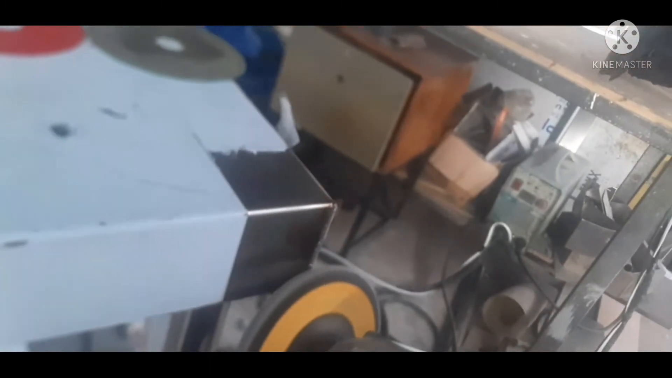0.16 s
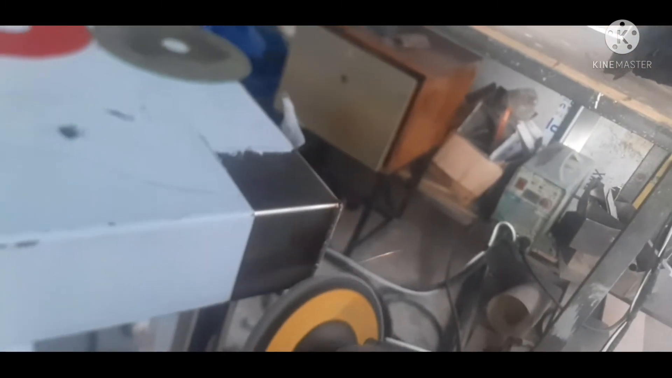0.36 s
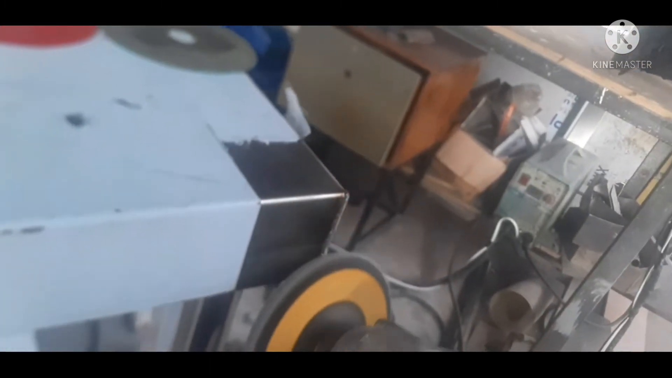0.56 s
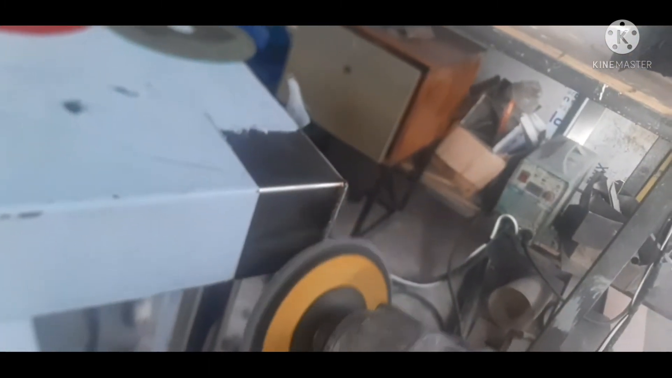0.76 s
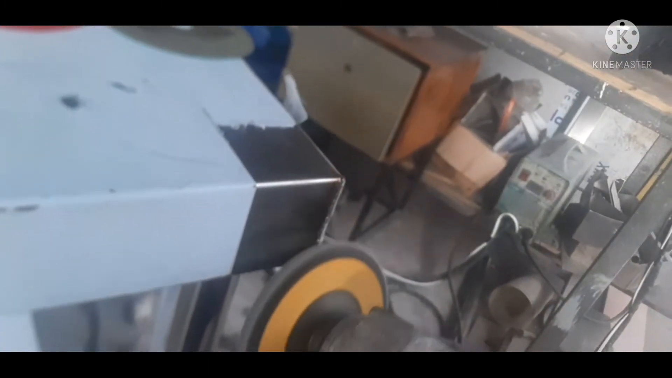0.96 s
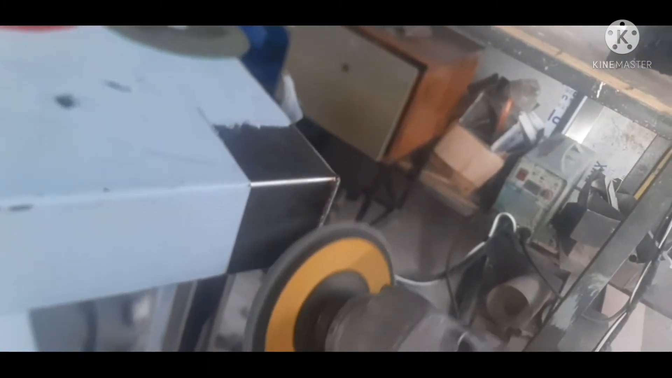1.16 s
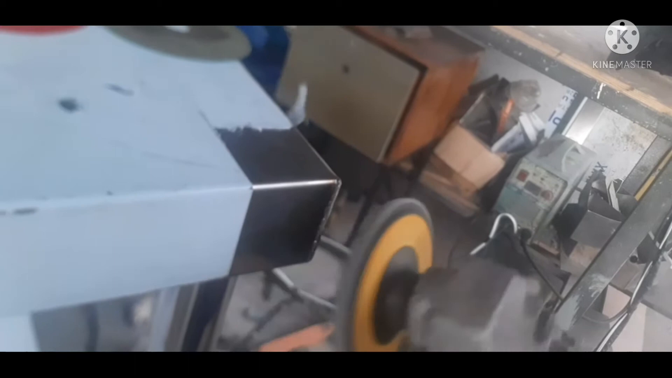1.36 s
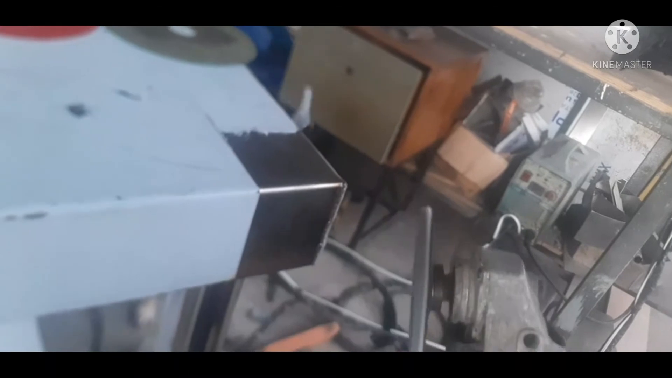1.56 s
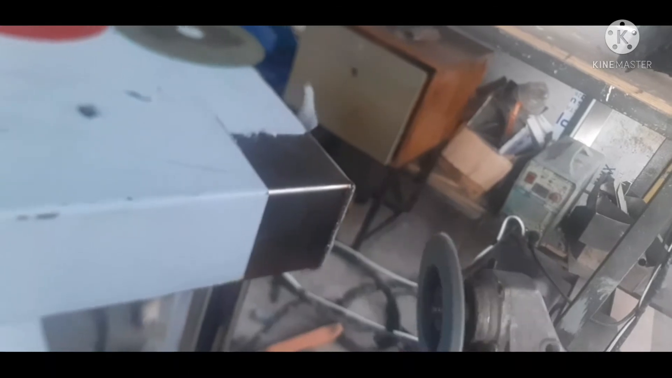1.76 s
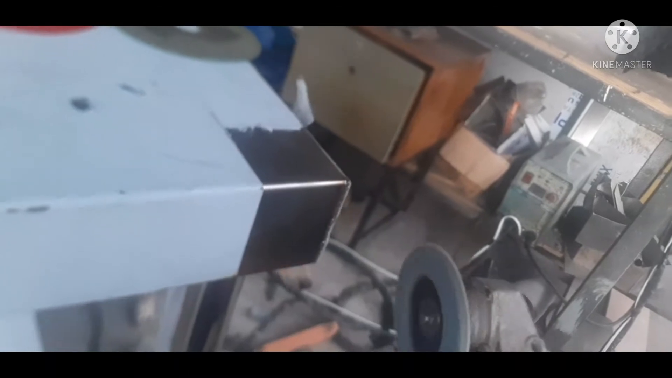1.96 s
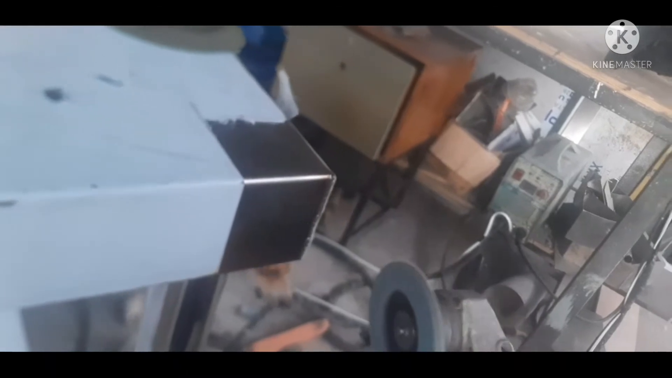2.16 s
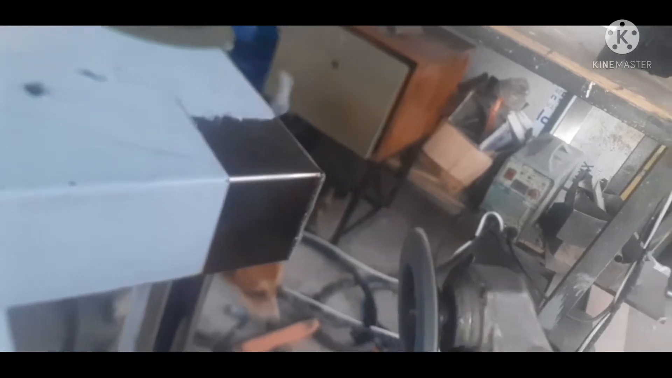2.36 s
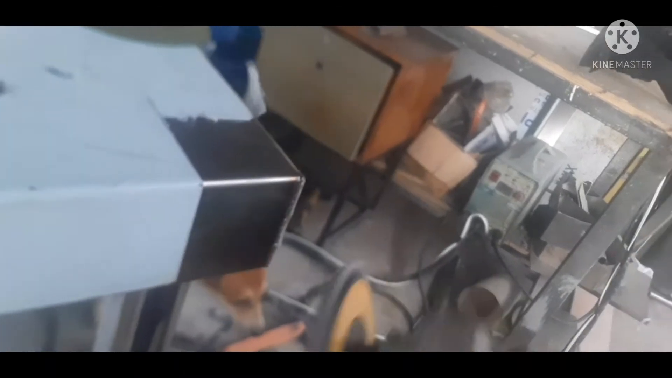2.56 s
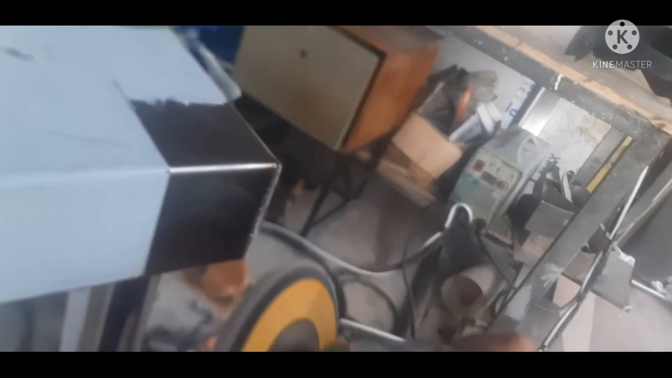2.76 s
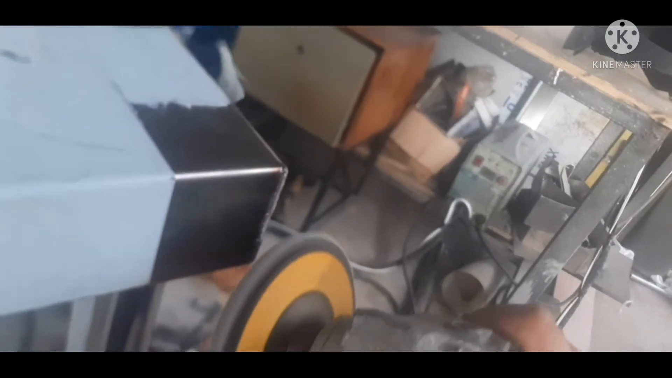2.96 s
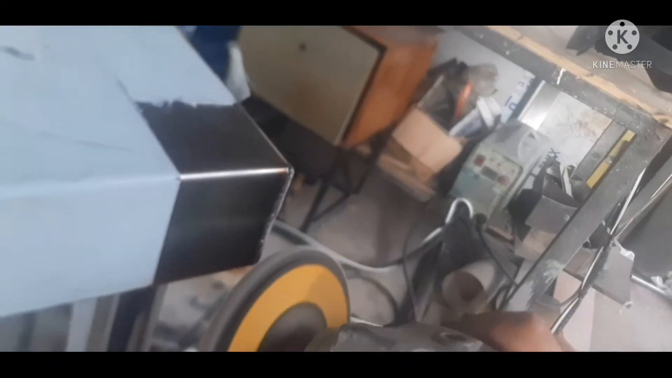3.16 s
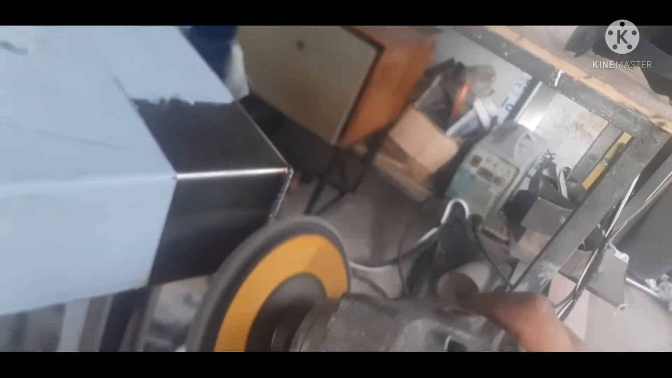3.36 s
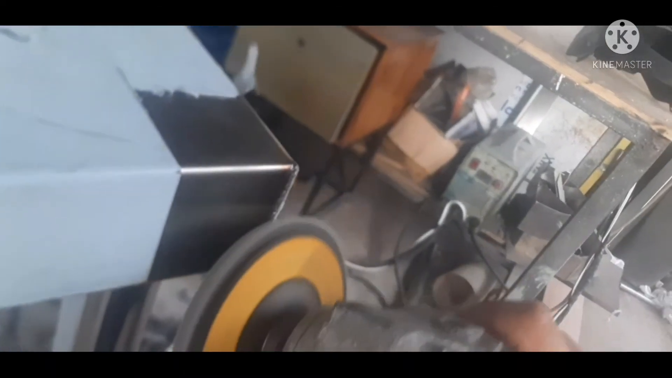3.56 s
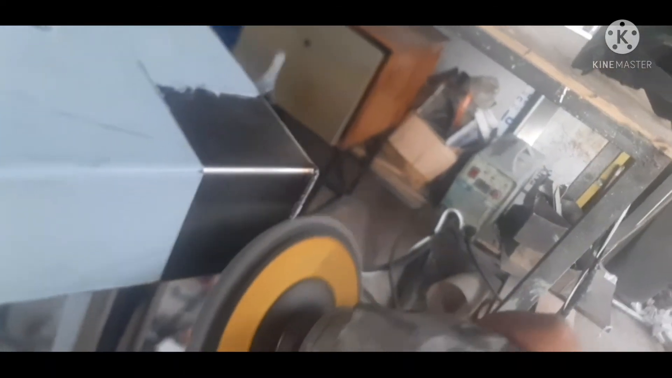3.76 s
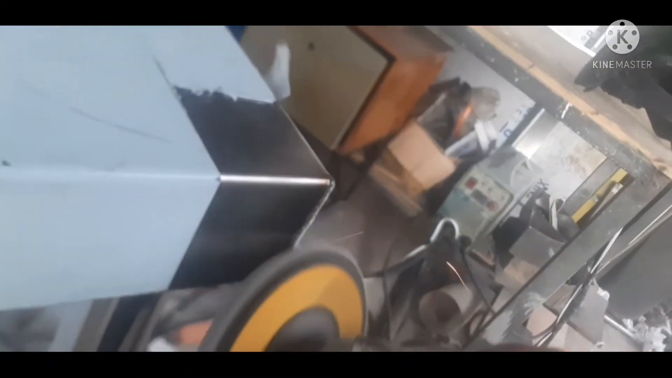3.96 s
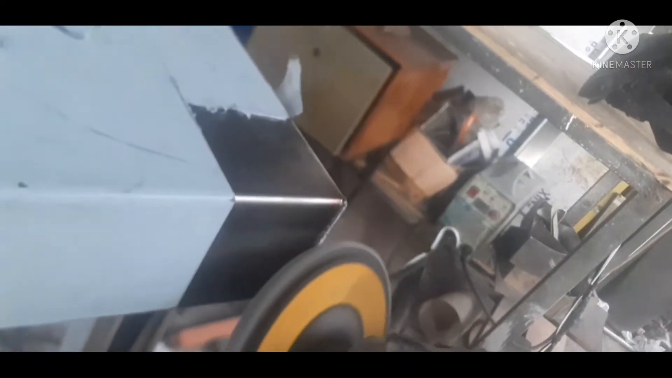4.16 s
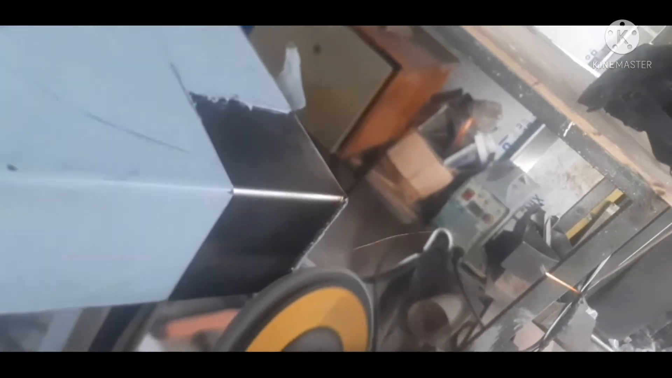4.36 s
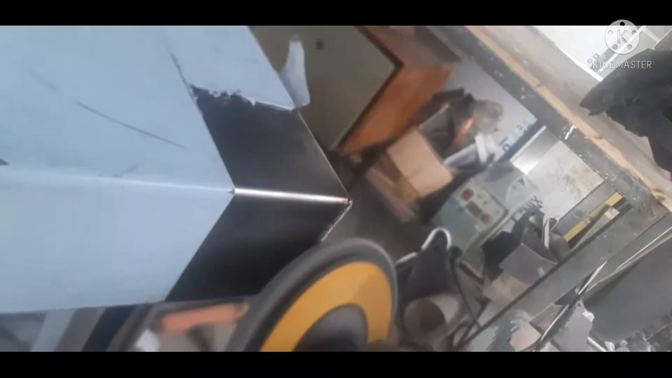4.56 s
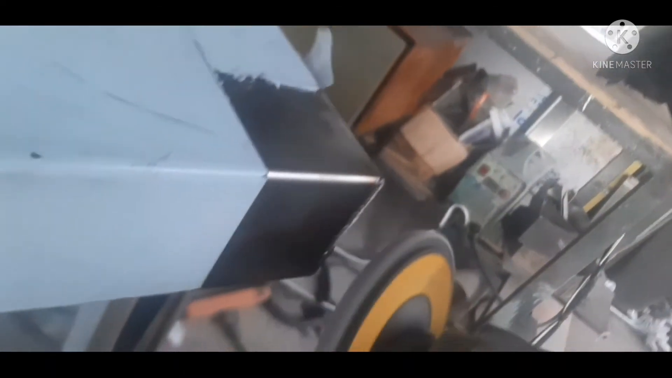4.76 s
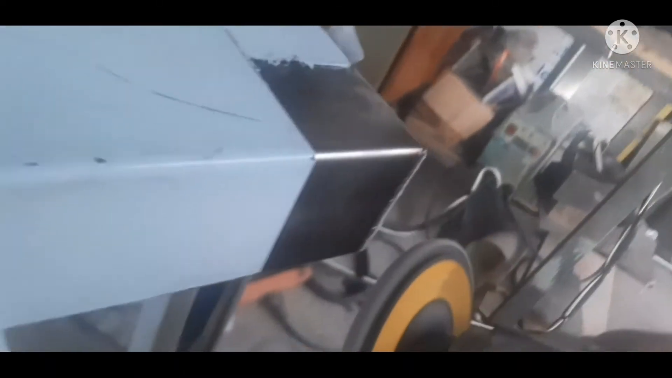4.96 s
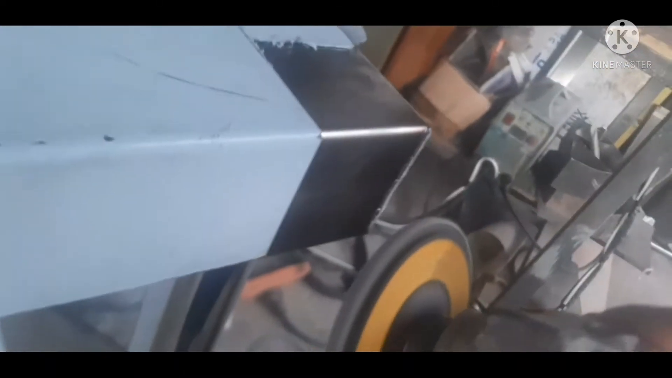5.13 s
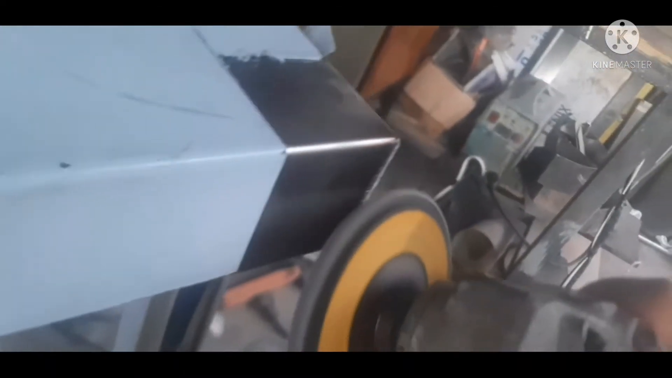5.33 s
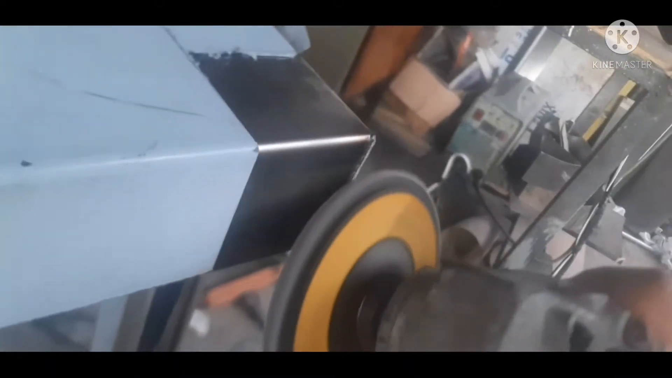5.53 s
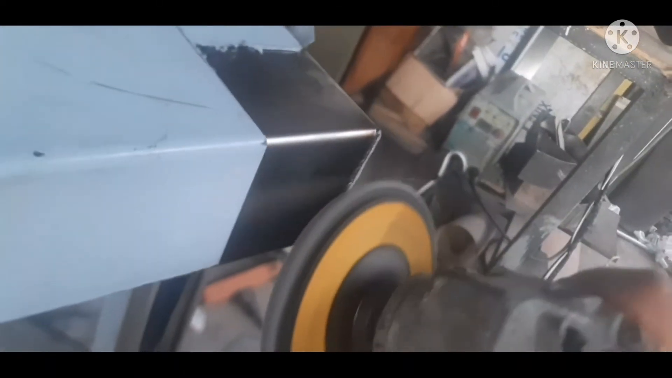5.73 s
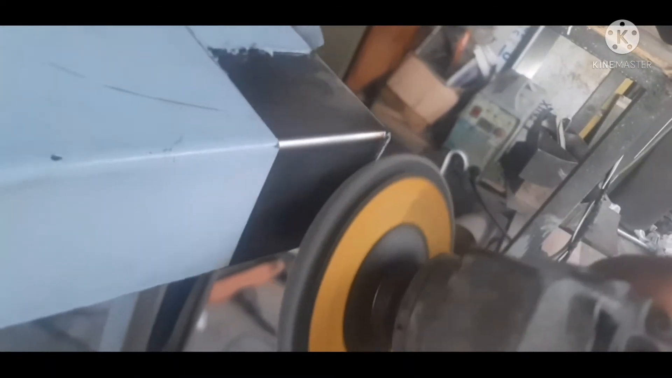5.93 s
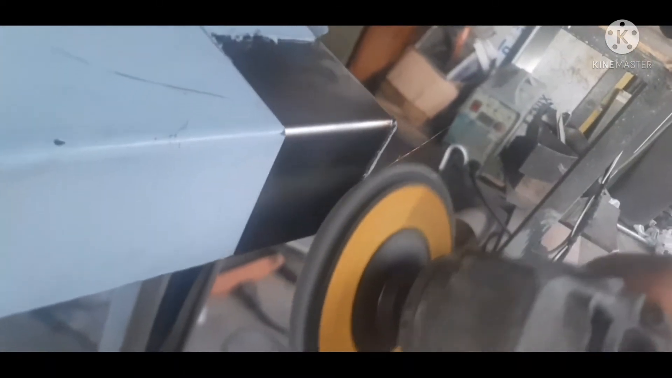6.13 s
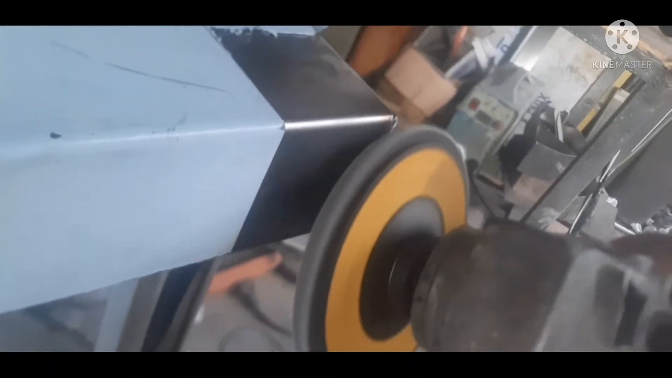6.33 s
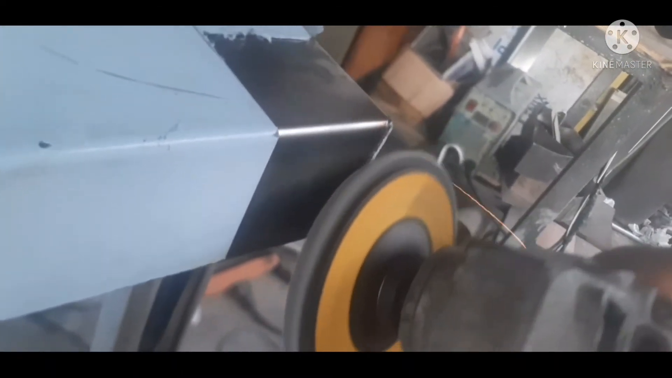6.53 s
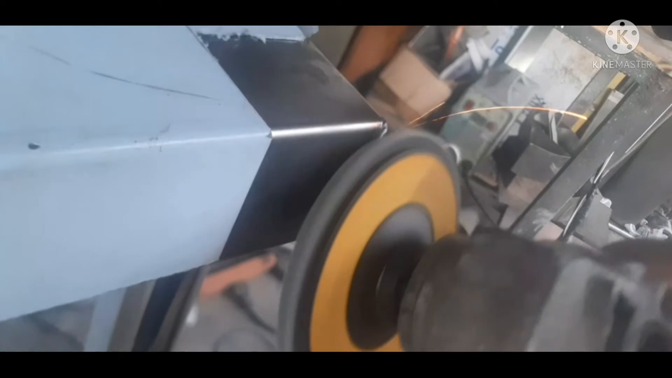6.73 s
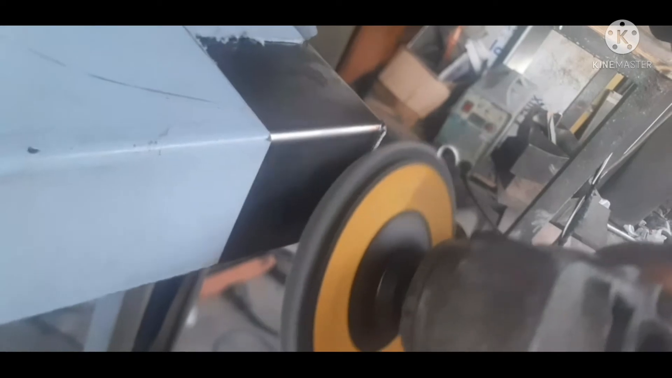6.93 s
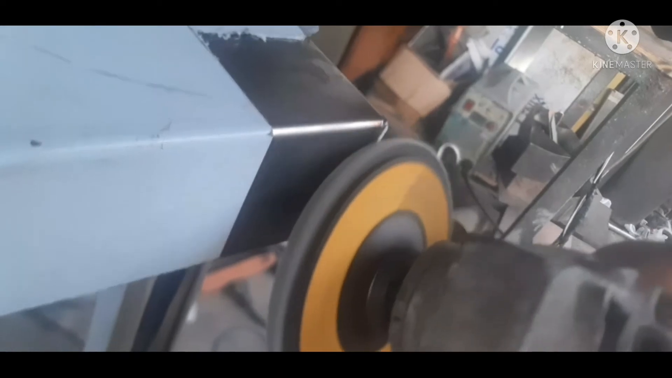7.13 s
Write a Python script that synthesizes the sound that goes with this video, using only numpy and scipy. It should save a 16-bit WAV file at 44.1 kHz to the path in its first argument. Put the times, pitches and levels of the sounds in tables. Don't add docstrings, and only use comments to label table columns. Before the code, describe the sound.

An angle grinder's flap disc scrapes harshly on steel over a rattling motor roar, lifts, then presses down twice more, close up in a workshop.

```python
import sys
import numpy as np
from scipy import signal
from scipy.fft import rfft, irfft
from scipy.io import wavfile
from scipy.ndimage import uniform_filter1d, minimum_filter1d, map_coordinates

SR = 44100
rng = np.random.default_rng(int(sys.argv[2]) if len(sys.argv) > 2 else 0)


def ratio_of_db(decibels):
    return 10 ** (np.asarray(decibels, float) / 20)


def put_to_file(sound):
    columns = np.atleast_2d(sound).T
    safe = np.clip(columns, -1, 1)
    whole_steps = np.round(safe * 32767)
    wavfile.write(sys.argv[1], SR, whole_steps.astype(np.int16))


N = 317079
SIZE, HOP = 512, 192
HZ = np.fft.rfftfreq(SIZE, 1 / SR)[:, None]
T = np.arange(N) / SR

# t/s, level/dB, brightness facing the phone/dB, guard twist/dB, front wall tilt/dB
TOOL = [(0.0, -25, 3, 10.5, 4.5), (0.5, -27, 4, 8, 4), (1.46, -26.5, 5, 4.5, 3), (1.64, -25, 5, 2, 1.5),
        (1.88, -29.5, 4, -2.5, -2.5), (2.27, -33, 3.5, -2.5, -1), (2.4, -32, 4, -2, 4.5),
        (2.68, -29, 5, -3.5, -2), (2.94, -24, 6.5, -3, -1.5), (3.1, -21, 7.5, -1.5, -1.5),
        (3.45, -23, 6.5, 2, 0.5), (4.0, -26, 5.5, 3, -1.5), (4.4, -26.5, 6, 2, -0.5),
        (4.79, -27, 6, 3, -3.5), (4.93, -25.5, 6, 3.5, 1), (5.3, -26, 4, -0.5, 2),
        (5.7, -26, 5.5, -2, -1.5), (6.0, -25.5, 6.5, 2, -4), (6.4, -26.5, 5.5, -5, -1.5),
        (7.19, -27, 6.5, -7, -3)]
# f/Hz, level/dB per Hz
FACING = [(650, -37), (1100, -6), (1540, -9.5), (2010, -2.5), (2460, -8.5), (2700, -1.5), (2920, -5),
          (3570, -1.5), (4030, -1), (4720, 1), (6750, -6.5), (8260, -19.5), (11300, -17), (14100, -18),
          (16000, -17)]
# f/Hz, level/dB per Hz
AWAY = [(650, -44), (1100, -11.5), (1930, -13), (2230, -3.5), (2520, -10.5), (3050, -10.5), (6240, -16),
        (6680, -18.5), (7140, -15), (7990, -23.5), (10100, -24.5), (12000, -24), (12900, -23), (13700, -31),
        (16000, -19)]
FACING_DB, AWAY_DB = 6.5, 1.5
# f/Hz, width/Hz, level/dB
HOUSING = [(1165, 47, 6), (2075, 83, 1.5), (2450, 120, 4.5), (3120, 120, 5.5), (3576, 215, 4.5),
           (4800, 120, 2.5), (5340, 450, 2), (6670, 65, 10), (11400, 710, 1.5), (13800, 620, 3.5)]
# f/Hz, level/dB
KNOCK = [(1000, -15), (2200, -5), (3600, 0), (5000, -3.5), (6600, 7.5), (8500, -5), (11800, -3), (14000, 4),
         (16000, 5)]
RING_HZ, RING_WIDTH_HZ, RING_DB = 6630, 300, 6.0
FRONT_HZ, GUARD_HZ, WALL_WIDTH_HZ, VENTS_HZ = 3550, 5100, 450, 9000
BODY_HZ = 1056


def motor(knocks_per_s=76.0, jitter_knocks=0.7, ring_s=0.003, patchy_db=1.1):
    wobble = evened(uniform_filter1d(rng.standard_normal(N), size=5000))
    knock_count = np.floor(T * knocks_per_s + jitter_knocks * wobble)
    knocks = np.diff(np.maximum.accumulate(knock_count), prepend=0) > 0
    knocks = knocks * rng.uniform(0.35, 1, N)
    decay = np.exp(-1 / (ring_s * SR))
    beat = signal.lfilter([1], [1, -decay], uniform_filter1d(knocks, size=20))
    t, hiss = frames(rng.standard_normal((2, N)))
    rattle = frames(evened(beat * rng.standard_normal((2, N))))[1]
    share = ratio_of_db(read(KNOCK) + loaded("rattle", t) + 7.2 * patches(len(t), bins=14, steps=5))
    z = (hiss + share * rattle) / np.sqrt(1 + share ** 2)

    facing = (curve(TOOL, t, column=2) - AWAY_DB) / (FACING_DB - AWAY_DB)
    near, far = (read(side, np.maximum(HZ, 1150)) for side in (FACING, AWAY))
    near = near - band_db(near, 1100, 2600)
    far = far - band_db(far, 1100, 2600)
    colour = far + np.clip(facing, -0.3, 1.3) * (near - far)
    colour = colour + sum(db / (1 + (2 * (HZ - hz) / width) ** 2) for hz, width, db in HOUSING)
    colour = colour + np.exp(-((HZ - RING_HZ) / RING_WIDTH_HZ) ** 2) * (RING_DB + loaded("ring", t))
    colour = colour + np.exp(-((HZ - FRONT_HZ) / WALL_WIDTH_HZ) ** 2) * curve(TOOL, t, column=4)
    colour = colour + np.exp(-((HZ - GUARD_HZ) / WALL_WIDTH_HZ) ** 2) * curve(TOOL, t, column=3)
    colour = colour + loaded("vents", t) / (1 + (VENTS_HZ / (HZ + 1)) ** 8)
    colour = colour + curve(BASS_CUT, t, column=2) / (1 + (HZ / BODY_HZ) ** 16)
    colour = colour - band_db(colour, 1100, 2600) + curve(TOOL, t)
    return ports(t, z, colour + patchy_db * patches(len(t), bins=4, steps=14))


# touch t/s, lift t/s, pressure/dB, flap tone/dB
STROKES = [
    (-0.3, 1.53, -26, -21),
    (3.63, 4.86, -23.5, -12),
    (5.645, 7.5, -23, -8.5),
]
# f/Hz, level/dB per Hz
SCRAPE = [(2000, -13), (4000, -1.5), (6500, -5), (7500, -10), (8400, -11.5), (9500, -7.5), (10300, -3),
          (11500, -2), (12500, -1), (13500, -5.5), (14600, -0.5), (15500, 1)]
FLAPS = 71
DIG_DB, DIG_S = 1, 0.27


def disc(memory=0.908, fresh=0.85, lumpy_db=2.0, patchy_db=1.5):
    turns = np.cumsum(speed()) / SR
    places = 4 * FLAPS
    grit = rng.standard_normal((int(160 * T[-1]), 2, places))
    grit = signal.lfilter([1], [1, -min(memory, 0.99)], grit, axis=0)
    grit = grit.transpose(1, 0, 2).reshape(2, -1)
    worn = evened(np.array([map_coordinates(g, [turns * places], order=3) for g in grit]))
    high_spots = evened(uniform_filter1d(rng.standard_normal(places), size=12, mode="wrap"))
    rim = ratio_of_db(lumpy_db * np.interp(turns % 1 * places, np.arange(places), high_spots))
    scrape = evened(rim * (worn + fresh * rng.standard_normal((2, N))))

    pressure, tone = np.zeros(N), np.zeros(N)
    wobble = evened(smooth_twice(rng.standard_normal((2, N)), 4000))
    for start, stop, db, flap_db in STROKES:
        dig = 1 - np.exp(-np.maximum(T - start, 0) / DIG_S)
        touch = contact(start, stop, T)
        pressure += touch * ratio_of_db(db + DIG_DB * dig + 0.6 * wobble[0])
        tone += touch * dig * ratio_of_db(flap_db + 1.3 * wobble[1])
    port_phase = np.array([[0], [2]])
    flap = np.cos(2 * np.pi * FLAPS * turns + 0.51 * np.sin(2 * np.pi * turns) + port_phase)
    t, z = frames(pressure * (scrape + tone * flap))
    colour = read(SCRAPE) - band_db(read(SCRAPE), 9500, 15500)
    return ports(t, z, colour + patchy_db * patches(len(t), bins=12, steps=9))


# from t/s, free f/Hz, full sag/Hz
SAG = [
    (0, 148.8, 3.6),
    (3.6, 149, 9.5),
    (5.6, 150, 13.2),
]
SAG_S, UNSTEADY_HZ = 1.5, 0.35


def speed():
    stroke = np.searchsorted([row[0] for row in SAG], T, "right") - 1
    start, free, sag = np.array(SAG)[stroke].T
    shake = evened(smooth_twice(rng.standard_normal(N), 6000))
    return free - sag * (1 - np.exp(-(T - start) / SAG_S)) + UNSTEADY_HZ * shake


TOUCH_S, LIFT_S = 0.0074, 0.04


def contact(start, stop, t):
    return np.clip(np.minimum((t - start) / TOUCH_S, (stop - t) / LIFT_S), 0, 1)


def load(t):
    return sum(contact(row[0], row[1], t) for row in STROKES)


FREE_DB = {"ring": -4, "rattle": -5.5, "vents": 2, "lean": -3.5}
LOADED_DB = {"ring": -2, "rattle": -6.5, "vents": 2, "lean": -3}


def loaded(name, t):
    return FREE_DB[name] + (LOADED_DB[name] - FREE_DB[name]) * load(t)


COAST_S, CATCH_S, COAST_HZ_PER_S = 2.08, 2.3, 1500
MESH_HZ, MESH_DB = 5600, -38.5


def mesh():
    lost_s = np.clip(CATCH_S - COAST_S - abs(T - CATCH_S), 0, 1)
    heard = np.exp(-((T - CATCH_S) / 0.24) ** 4)
    whine = heard * np.sin(2 * np.pi * np.cumsum(MESH_HZ - COAST_HZ_PER_S * lost_s) / SR)
    return whine * ratio_of_db(MESH_DB + np.array([[-12], [3]]))


# f/Hz, level/dB per Hz
RUMBLE = [(12, -47), (20, -22), (92, -1.5), (149, -1.5), (343, -5), (384, -6), (550, -5), (720, -46),
          (1210, -120)]
# t/s, level/dB, length/s
BUMPS = [(0.313, -65, 0.037), (0.954, -53, 0.034), (1.095, -71, 0.055), (2.03, -53, 0.1), (2.15, -62, .04),
         (2.748, -61, 0.032), (2.882, -56, 0.1), (3.29, -56.5, 0.3), (3.457, -60, 0.046), (3.83, -64, 0.33),
         (4.398, -67, 0.096), (5.23, -67, 0.055), (5.4, -70, .1), (5.786, -57, .05), (5.965, -57, 0.12),
         (6.358, -61, .07)]
RUMBLE_DB, RUMBLE_LOAD_DB = -68, 8.5


def rumble(lumpy_db=2.5):
    hz = np.fft.rfftfreq(N, 1 / SR)
    low = irfft(rfft(rng.standard_normal((2, N))) * ratio_of_db(read(RUMBLE, hz)), N)
    lumps = evened(smooth_twice(rng.standard_normal(N), 1200))
    level = ratio_of_db(RUMBLE_DB + RUMBLE_LOAD_DB * load(T) + lumpy_db * lumps)
    level = level + sum(ratio_of_db(db) * np.exp(-(2 * (T - s) / length) ** 2) for s, db, length in BUMPS)
    return evened(low) * level * ratio_of_db(np.array([[2.5], [5.5]]))


# f/Hz, share
SAME = [(500, 0.41), (1400, 0.88), (3000, 0.48), (6500, 0.46), (10000, 0.27), (15000, 0.26)]
# f/Hz, phase/rad
LEAD_EARLY = [(0, -2), (3790, 0.64), (4130, 1.5), (4740, 0.98), (5080, -3.15), (5770, 0.7), (7060, -1.0),
              (8010, 2.5), (8270, -2), (8870, -1.5), (9650, -2), (11700, 2), (15200, 1.5), (16400, 6.4)]
# f/Hz, phase/rad
LEAD_LATE = [(0, 0), (1210, 0.4), (3530, 0.56), (4570, -3), (5080, -1.5), (6290, -2.5), (6720, -1.2),
             (7840, 4.5), (9730, 5), (10500, 3.5), (12700, 9), (13000, 14), (14200, 0.5), (16400, 12.5)]
# t/s, share of the late lead
SIDE_ON = [(0, 0), (1.5, 0), (1.9, 1), (2.7, 1), (3, 0), (4.7, 0), (5, 1), (7.19, 1)]
# f/Hz, level/dB
TREBLE_BALANCE = [(5000, 0), (8000, 1.5), (15000, 2.5)]


def ports(t, z, colour_db):
    moved = np.interp(t, *np.transpose(SIDE_ON))
    turn = (1 - moved) * np.exp(-1j * read(LEAD_EARLY)) + moved * np.exp(-1j * read(LEAD_LATE))
    same = np.clip(read(SAME), 0, 1)
    right = same * turn / abs(turn + 1e-9) * z[0] + np.sqrt(1 - same ** 2) * z[1]
    lean_db = (loaded("lean", t) + read(TREBLE_BALANCE)) / 2
    return np.array([z[0] * ratio_of_db(lean_db), right * ratio_of_db(-lean_db)]) * ratio_of_db(colour_db + 1.5)


# t/s, corner f/Hz, body under the housing's limit/dB
BASS_CUT = [(0, 735, -7.5), (1.6, 766, -6), (2.56, 775, 1), (2.6, 870, -7.5), (2.98, 960, -8),
            (3.06, 1086, -5.5), (7.19, 1117, 1.5)]


def bass_cut(x, leak_db=-8.0):
    hz, t, z = signal.stft(x, SR, nperseg=2048, noverlap=1536)
    under = curve(BASS_CUT, t) / (hz[:, None] + 1)
    steep = 1 / (1 + under ** 30)
    gain = np.sqrt(steep + ratio_of_db(2 * leak_db) / (1 + under ** 4.0))
    return signal.istft(z * gain, SR, nperseg=2048, noverlap=1536)[1][:, :N]


def evened(x):
    return x / np.sqrt(np.mean(x ** 2, axis=-1, keepdims=True) + 1e-20)


def smooth_twice(x, size):
    return uniform_filter1d(uniform_filter1d(x, size=size), size=size)


def read(points, hz=HZ):
    f, value = np.transpose(points)
    return np.interp(np.log(hz + 1), np.log(f + 1), value)


def curve(rows, t, column=1):
    return np.interp(t, np.array(rows)[:, 0], np.array(rows)[:, column])


def band_db(colour_db, lo_hz, hi_hz):
    inside = (HZ[:, 0] >= lo_hz) & (HZ[:, 0] < hi_hz)
    return 10 * np.log10((ratio_of_db(colour_db[inside]) ** 2).sum(axis=0) / len(HZ))


def frames(x):
    return signal.stft(x, SR, nperseg=SIZE, noverlap=SIZE - HOP)[1:]


def samples(z):
    return signal.istft(z, SR, nperseg=SIZE, noverlap=SIZE - HOP)[1][..., :N]


def patches(count, bins, steps):
    field = rng.standard_normal((count, len(HZ))).T
    field = uniform_filter1d(uniform_filter1d(field, bins, axis=0), steps, axis=1)
    return field / field.std()


def scene():
    tool = samples(motor() + disc()) + mesh()
    return bass_cut(tool) + rumble()


def limiter(x, ceiling=0.9):
    room = np.minimum(ceiling / (abs(x).max(axis=0) + 1e-9), 1)
    return x * uniform_filter1d(minimum_filter1d(room, size=201), size=200)


# t/s, length/s, centre f/Hz, width/Hz
STARVED = [(.2, .4, 8700, 800), (.8, .14, 8900, 1400), (1.4, .7, 8700, 1200), (2.2, .8, 9200, 2600),
           (2.1, .9, 13100, 900), (2.0, .15, 15300, 1200), (2.47, .18, 15200, 1400), (2.45, .9, 15300, 900),
           (2.45, .25, 7900, 700), (3.2, .8, 13600, 1200), (5.18, .2, 8900, 2400), (5.18, .1, 8900, 2000),
           (5.65, .2, 8800, 2200), (6.28, .22, 8400, 2000), (6.28, .14, 8600, 2400), (6.29, .1, 8400, 1400),
           (.25, .2, 8600, 500)]
STARVED_DB = 11


def gate(x, bin_db=-12.0, band_db=-16.5, from_hz=5600):
    hz, t, z = signal.stft(x, SR, nperseg=2048, noverlap=1536)
    power = uniform_filter1d(abs(z) ** 2, size=4, axis=2)
    roar = power[:, (hz > 1000) & (hz < 7000)].mean(axis=(0, 1))
    treble = power[:, (hz > 1e4) & (hz < 15e3)].mean(axis=(0, 1))
    roar = roar ** 0.7 * treble ** 0.3
    short = 0
    for s, length, mid_hz, width in STARVED:
        off_time = (2 * (t - s) / length) ** 4
        off_band = (2 * (hz[:, None] - mid_hz) / width) ** 4
        short = short + np.exp(-off_time - off_band)
    luck = rng.random((len(hz) // 10 + 1, len(t) // 3 + 1))
    luck = np.kron(luck, np.ones((10, 3)))[:len(hz), :len(t)]
    roar = roar * ratio_of_db(2 * STARVED_DB * short * (0.15 + luck ** 2))
    bins = power.mean(axis=0)
    bands = uniform_filter1d(bins, size=14, axis=0)
    keep = (bins > roar * ratio_of_db(2 * bin_db)) & (bands > roar * ratio_of_db(2 * band_db))
    keep[hz < from_hz] = True
    return signal.istft(z * keep, SR, nperseg=2048, noverlap=1536)[1][:, :N]


def low_pass(x):
    return signal.sosfilt(signal.butter(12, 16800, fs=SR, output="sos"), x)


EDGE_HZ = 15420


def record(dry):
    edge = signal.firwin(511, EDGE_HZ, window=("kaiser", 9), fs=SR)
    mix = signal.oaconvolve(gate(limiter(dry)), edge[None], "same")
    return low_pass(mix)


dry = scene()
out = record(dry)
put_to_file(out)
```